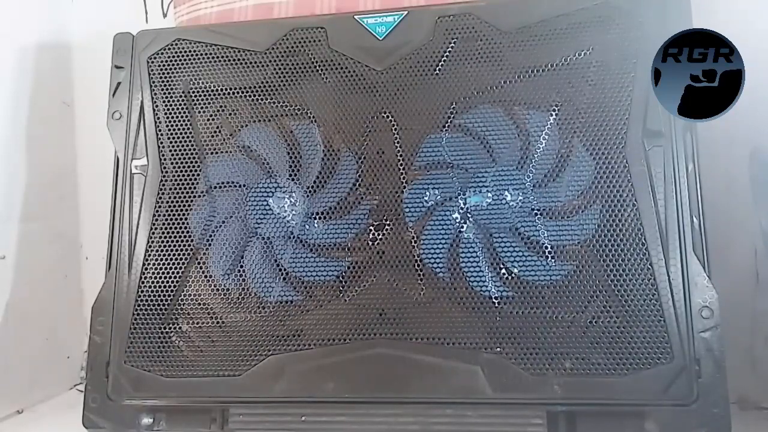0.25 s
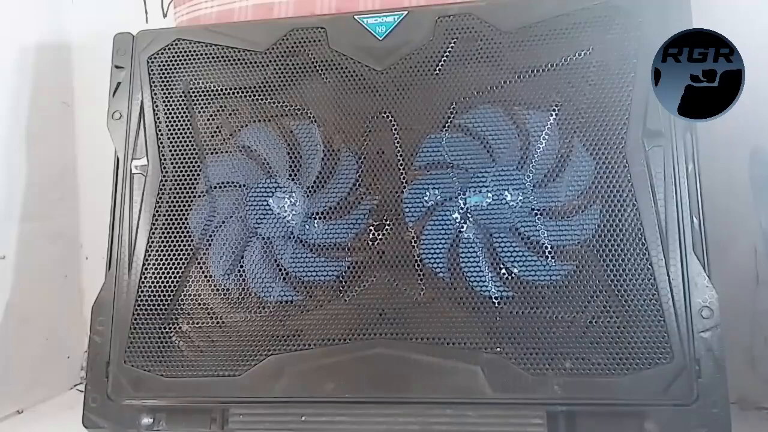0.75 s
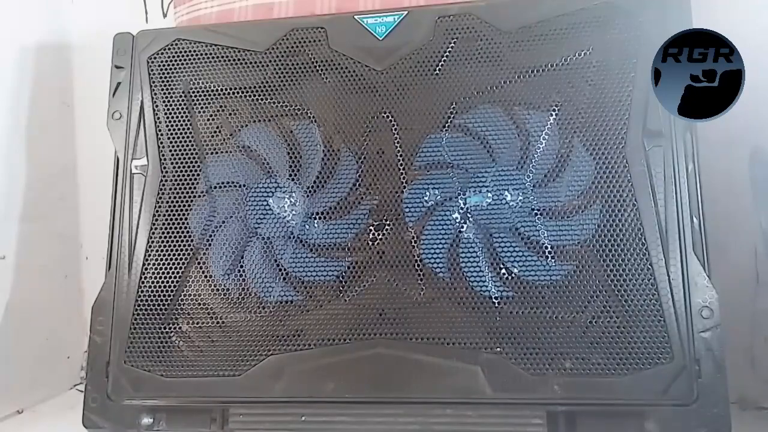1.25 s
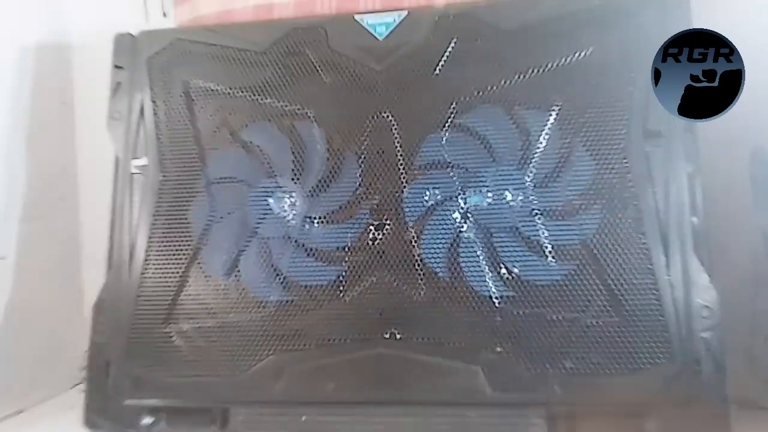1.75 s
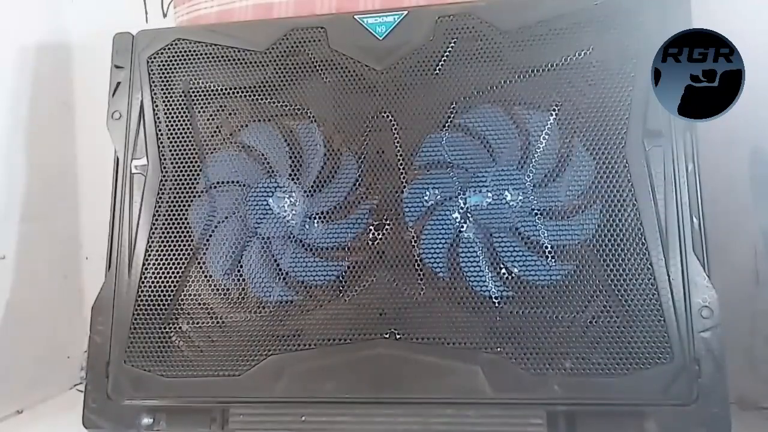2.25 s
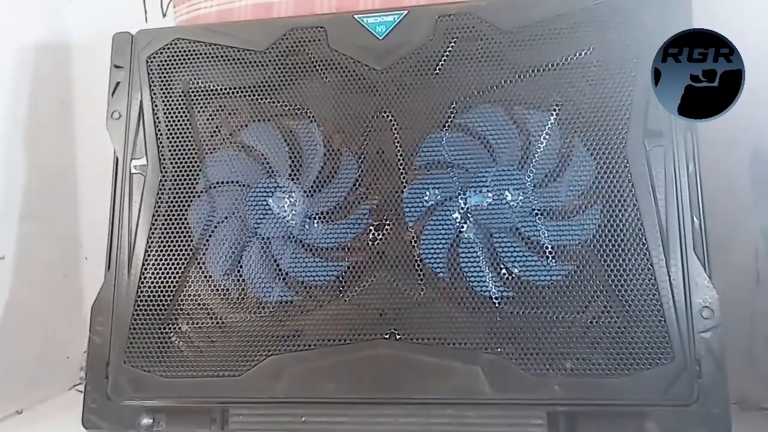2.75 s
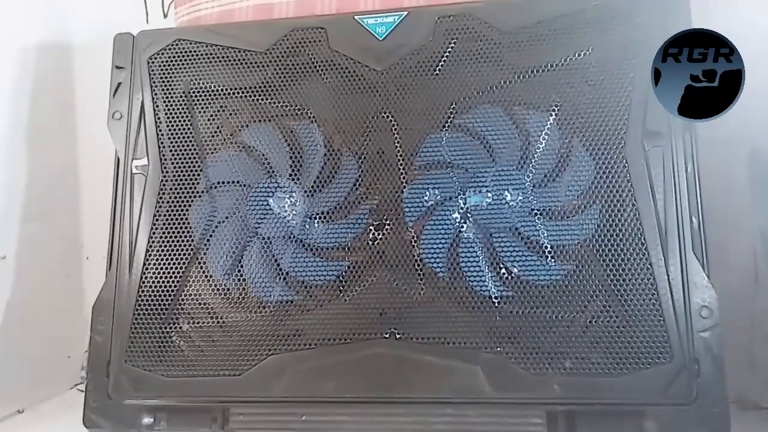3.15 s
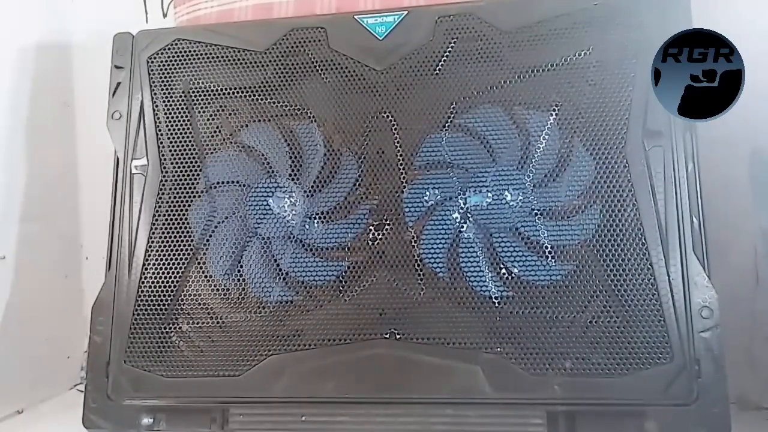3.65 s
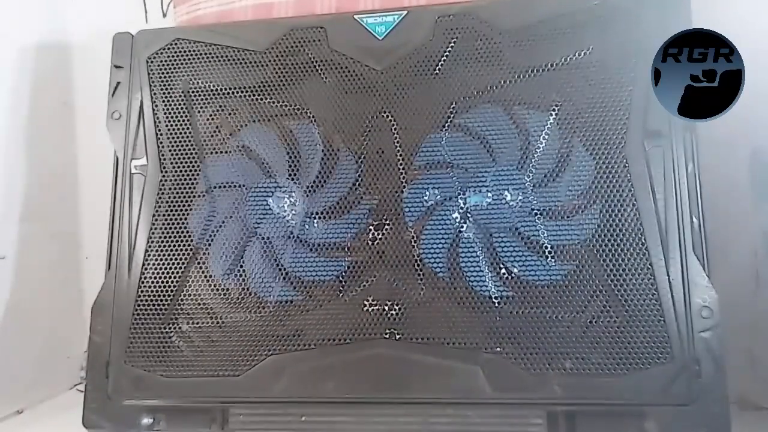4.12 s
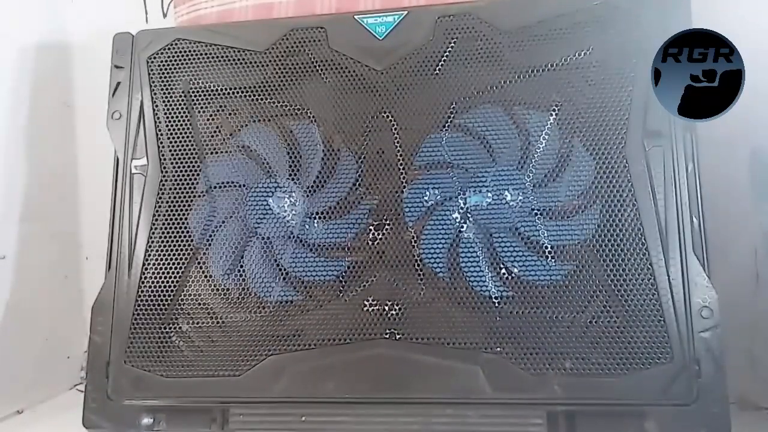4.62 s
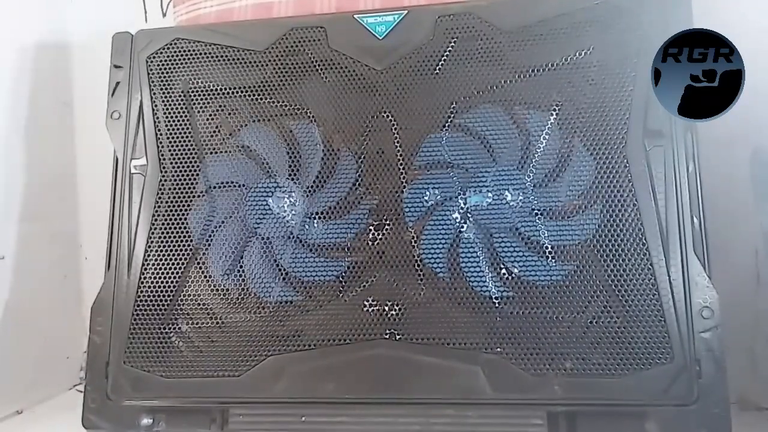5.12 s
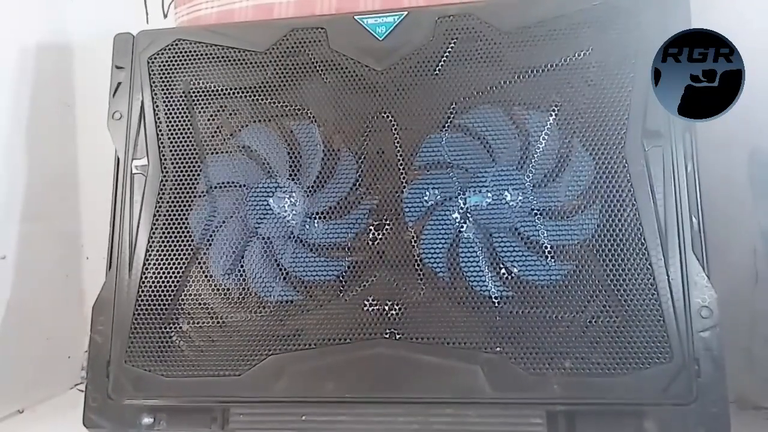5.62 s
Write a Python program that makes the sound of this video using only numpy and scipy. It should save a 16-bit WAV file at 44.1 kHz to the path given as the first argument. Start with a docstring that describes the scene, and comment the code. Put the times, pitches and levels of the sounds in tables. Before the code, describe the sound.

A gas-powered rifle fires two bursts of two shots each, about two seconds apart, at a mesh-topped plastic stand indoors. The cracks are loud and slightly distorted, with a short echo and a metallic ring. After the first burst, steel pellets ricochet, knock hollowly and roll to rest inside a box. After the second, they knock again and skip across a hard floor in bright, weakening ticks over a faint hiss.

```python
"""BB rifle in a hard-walled room

A CO2 rifle fires two full-auto bursts, two shots each, at a mesh-topped plastic stand. The gas blasts
overload the microphone and the mesh rings. Steel BBs ricochet, knock and roll about the target box,
then bounce on the hard floor. Under it all lie soft rustles, room noise and an electronic whine."""
import sys
import numpy as np
from scipy import signal
from scipy.fft import rfft, irfft, next_fast_len
from scipy.io import wavfile

SR = 44100
rng = np.random.default_rng(int(sys.argv[2]) if len(sys.argv) > 2 else 0)


def dump(signal):
    """Clip the signal to [-1, 1] and save it as 16-bit WAV at the path in sys.argv[1]."""
    limited = np.clip(np.atleast_2d(signal).T, -1, 1)
    pcm = np.round(limited * 32767).astype(np.int16)
    wavfile.write(sys.argv[1], SR, pcm)


N = 259263

# tone colour of a steel BB's hard tick: f/Hz, level/dB
TICK_SPECTRUM = [(200, -29), (1500, -30), (3300, -3.5), (4600, -1.5), (5900, 0.5), (7000, -3.5),
                 (8800, -15.5), (15000, -29)]
# tone colour of rolling and rustling: f/Hz, level/dB
RUMBLE_SPECTRUM = [(50, -42), (100, -24), (160, 2), (270, -4.5), (400, 4), (820, 6), (1600, -3.5),
                   (3200, -8), (6200, -7.5), (9000, -22), (15000, -30)]


def amp(db):
    """Turn decibels into a gain."""
    return 10 ** (np.asarray(db) / 20)


def unit(x):
    """Scale x to an average power of 1."""
    return x / np.sqrt(np.mean(x ** 2) + 1e-20)


def blow(x):
    """Scale x to the energy of 10 ms at 0 dB."""
    return x / np.linalg.norm(x) * np.sqrt(SR / 100)


def along(points, hz):
    """Read a curve of (f/Hz, value) points at hz, on a log frequency axis."""
    freqs, values = np.transpose(points)
    return np.interp(np.log(hz + 1), np.log(freqs + 1), values)


def filtered(x, response):
    """Scale each frequency in x by response(hz)."""
    size = next_fast_len(len(x) + 8192)
    return irfft(rfft(x, size) * response(np.fft.rfftfreq(size, 1 / SR)), size)[:len(x)]


def coloured(x, spectrum, size=4096):
    """Give x a tone colour without smearing sound ahead of a hit."""
    cepstrum = irfft(np.log(amp(along(spectrum, np.fft.rfftfreq(size, 1 / SR)))))
    # fold the filter's early half onto its late half
    cepstrum[1:size // 2] *= 2
    cepstrum[size // 2 + 1:] = 0
    return signal.fftconvolve(x, irfft(np.exp(rfft(cepstrum))))[:len(x)]


def add(track, s, x):
    """Mix x into the track, starting at s seconds."""
    part = track[round(s * SR):][:len(x)]
    part += x[:len(part)]


def swells(rows):
    """A gain over time that rises and falls like a hill for each row."""
    t = np.arange(N) / SR
    return np.max([amp(db) * np.exp(-((t - s) / half) ** 2) for s, half, db in rows], axis=0)


def burst(spectrum, t60, snap=0, size=8192):
    """Noise that fades by 60 dB in t60 seconds; snap adds a sharp first pulse."""
    t = np.arange(size) / SR
    noise = rng.standard_normal(size) * amp(-60 * t / t60)
    noise[0] += snap * np.linalg.norm(noise)
    return blow(coloured(noise, spectrum))


def ring(modes, spread, count=4):
    """A struck object rings: each note is a cluster of close tones, at a new strength every hit."""
    t = np.arange(SR * 3 // 4) / SR
    out = np.zeros(len(t))
    for hz, db, t60 in modes:
        detune, phase = rng.uniform(-1, 1, (2, count, 1))
        cluster = np.sin(2 * np.pi * hz * (1 + spread * detune) * t + np.pi * phase).sum(0)
        out += unit(cluster) * amp(db + rng.normal(0, 2.2) - 60 * t / t60)
    return blow(out)


def ping(t60, low_hz, high_hz, count=3, size=4096):
    """A few brief tones whose pitch depends on the spot that is struck."""
    t = np.arange(size) / SR
    hz = low_hz * (high_hz / low_hz) ** rng.random((count, 1))
    return blow(np.sin(2 * np.pi * hz * t).sum(0) * amp(-60 * t / t60))


def echo(spectrum, build_s, size=30720):
    """The walls answer a hit with a wash of sound that builds up; its middle pitches last longest."""
    # how long the room rings: f/Hz, t60/s
    room_decay = [(60, 0.12), (200, 0.48), (1000, 0.57), (3000, 0.55), (6000, 0.47), (9000, 0.35),
                  (15000, 0.31)]
    hz, t, noise = signal.stft(rng.standard_normal(size), SR, nperseg=1024)
    gain = amp(along(spectrum, hz)[:, None] - 60 * t / along(room_decay, hz)[:, None])
    tail = signal.istft(noise * gain, SR, nperseg=1024)[1][:size]
    return blow(tail * (1 - np.exp(-np.arange(size) / SR / build_s)))


def patter(spectrum, per_s, scatter_db, room_db):
    """Many tiny touches at random times, each a short scrape, with their echo."""
    taps = (rng.random(N) < per_s / SR) * amp(scatter_db * rng.uniform(-1, 1, N))
    fade = amp(-60 * np.arange(SR // 20) / SR / 0.012)
    scrapes = signal.fftconvolve(taps, fade)[:N] * rng.standard_normal(N)
    room = signal.fftconvolve(scrapes, echo(spectrum, build_s=.005))[:N]
    return unit(unit(coloured(scrapes, spectrum)) + amp(room_db) * unit(room))


def background(air_db=-61.6, whine_db=-73, whine_hz=7880, width_hz=55):
    """Quiet room noise and a thin, fuzzy electronic whine."""
    # tone colour of the room noise: f/Hz, level/dB
    air_spectrum = [(15, -50), (25, -21), (65, -8.5), (123, -3), (166, -4.5), (270, 0.5), (476, -4.5),
                    (545, -4.5), (887, -11), (988, -11.5), (3080, -15.5), (7310, -17), (7920, -13),
                    (9070, -27.5), (13200, -18), (16000, -27.5)]
    air = coloured(rng.standard_normal(N), air_spectrum)
    whine = filtered(rng.standard_normal(N), lambda hz: 1 / (1 + ((hz - whine_hz) / width_hz) ** 2))
    return amp(air_db) * unit(air) + amp(whine_db) * unit(whine)


def rustling():
    """Handling makes soft swells of tiny scrapes."""
    # rustles: peak t/s, half length/s, level/dB
    rustles = [(.2, .3, -68.5), (.58, 0.077, -64), (.89, .11, -61), (1.32, 0.16, -65), (1.65, .08, -65)]
    return swells(rustles) * patter(RUMBLE_SPECTRUM, per_s=430, scatter_db=6, room_db=0)


def rifle(room_db=2):
    """Trigger and bolt click, gas blasts out, and the BB strikes the mesh a moment later."""
    # trigger and bolt clicks: t/s, level/dB
    clicks = [(1.342, -55.5), (1.6402, -30.5), (3.782, -43.5), (3.9322, -30)]
    # shots: t/s, blast/dB, BB impact/dB, flight time/s, air push/dB, mesh ring/dB
    shots = [(1.6528, 3.5, 11.5, .017, -13.5, 1), (1.7236, 7, 8.5, .017, 0.5, 1),
             (3.9456, 4, 7.5, .019, -6, -12.5), (4.0150, 4.5, 6.5, .019, -7, -14)]
    # tone colour of blasts, impacts and clicks: f/Hz, level/dB
    blast_spectrum = [(40, -27), (100, -23), (170, -10.5), (450, -8.5), (700, -3.5), (1500, -0.5),
                      (2400, -1), (4500, 0.5), (6200, 3.5), (7200, -1.5), (8800, -11.5), (15000, -25.5)]
    # tone colour of the air pushed by an impact: f/Hz, level/dB
    push_spectrum = [(10, -2), (30, -2), (70, -9.5), (130, -9.5), (250, -11), (500, -23), (2000, -57)]
    # notes of the mesh panel: f/Hz, level/dB, t60/s
    mesh_modes = [(1416, 2, .6), (1455, 2, .62), (1531, 1.5, .65), (1570, 2.5, .55), (1760, -5, .56),
                  (2280, -11, .5), (2500, -9.5, .5), (3420, -11, .5), (6019, -7, .5), (7400, -13.5, .36)]
    out = np.zeros(N)
    for s, db in clicks:
        add(out, s, amp(db) * burst(blast_spectrum, t60=.06))
        add(out, s, amp(db + room_db) * echo(blast_spectrum, build_s=.0063))
    for s, blast_db, impact_db, flight_s, push_db, ring_db in shots:
        add(out, s, amp(blast_db) * burst(blast_spectrum, t60=.33))
        add(out, s, amp(blast_db + room_db) * echo(blast_spectrum, build_s=.0058))
        hit_s = s + flight_s
        add(out, hit_s, amp(impact_db + 5.5) * burst(blast_spectrum, t60=.091))
        add(out, hit_s, amp(impact_db + room_db) * echo(blast_spectrum, build_s=.0066))
        add(out, hit_s, amp(ring_db) * ring(mesh_modes, spread=.01))
        add(out, hit_s, amp(push_db) * burst(push_spectrum, t60=.08))
    return out


def boom(room_db=-4):
    """The hollow low note of the box and stand, with its echo."""
    # tone colour of the boom: f/Hz, level/dB
    boom_spectrum = [(40, -48), (105, -34), (150, 3), (210, -2), (330, -0.5), (500, -18), (1200, -39.5),
                     (4000, -66)]
    out = amp(room_db) * echo(boom_spectrum, build_s=.01)
    add(out, 0, burst(boom_spectrum, t60=.04, snap=.82))
    return out


def rocking_stand(push_s=.0014):
    """The stand thumps back on its feet, pushing the air and booming."""
    # jolts: t/s, air push/dB, boom/dB
    jolts = [(1.876, -16.5, -21), (2.016, -46, -25), (2.2235, -65, -44.5), (2.358, -41, -51)]
    age = np.arange(4096) / SR / push_s
    push = blow(age * (1 - age / 2) * np.exp(-age))  # one swing of pressure and its weaker return
    out = np.zeros(N)
    for s, push_db, boom_db in jolts:
        add(out, s, amp(push_db) * push)
        add(out, s, amp(boom_db) * boom())
    return out


def contact(knock_db, clack_db, tick_db, t60, room_db):
    """One BB hit: a hollow knock, a plastic clack and a hard, ringing tick, each with its echo."""
    # tone colour of the knock: f/Hz, level/dB
    knock_spectrum = [(50, -46), (90, -33), (140, -7.5), (280, -5.5), (450, -2), (750, 1.5), (1100, 2),
                      (1800, -7.5), (5000, -49)]
    # tone colour of the clack: f/Hz, level/dB
    clack_spectrum = [(300, -35), (900, -6.5), (1500, 3.5), (2500, 4.5), (3500, -6), (6000, -24.5),
                      (15000, -38)]
    # notes of the hard floor under a BB: f/Hz, level/dB, t60/s
    floor_modes = [(3550, -4.5, 0.19), (4600, 1, 0.23), (5480, 1.5, 0.3), (5970, 5.5, 0.2)]
    # a BB is too small to give off deep bass: f/Hz, level/dB
    bass_cut = [(40, -17), (130, 0)]
    out = np.zeros(SR)
    snap = .034 / max(t60, .015)  # a brief hit is nearly one clean pulse, a long one chatters
    add(out, 0, amp(knock_db - .5) * burst(knock_spectrum, t60=.05, snap=1.05))
    add(out, 0, amp(clack_db) * burst(clack_spectrum, t60, snap * .69))
    add(out, 0, amp(tick_db - 1) * burst(TICK_SPECTRUM, t60, snap))
    add(out, 0, amp(tick_db - 3) * ping(t60, low_hz=2784, high_hz=7490))
    add(out, 0, amp(tick_db + room_db - 3) * ring(floor_modes, spread=.011))
    add(out, 0, amp(knock_db + room_db + 2.5) * echo(knock_spectrum, build_s=.0021))
    add(out, 0, amp(clack_db + room_db + .3) * echo(clack_spectrum, build_s=.0021))
    add(out, 0, amp(tick_db + room_db - .3) * echo(TICK_SPECTRUM, build_s=.0021))
    return coloured(out, bass_cut)


def sharp_ticks(knock_under_clack_db=11, room_db=-11, room_db_per_s=33):
    """Hard glancing hits on the stand and mesh, plus three faint ticks near 3 s as loose BBs settle."""
    # BB ticks: t/s, tick/dB, clack above tick/dB, chatter t60/s
    ticks = [(1.8783, -5, -20, .03), (1.9078, -10.5, -3.5, .045), (2.2235, -37.5, 8, 0.044),
             (2.245, -37, 6, .048), (2.2603, -33.5, 2, 0.06), (2.3038, -40.5, 16, .03),
             (2.3085, -31, 10.5, 0.026), (2.3244, -22.5, 1, 0.056), (2.3277, -21.5, -10, .018),
             (2.3574, -13.5, -.5, 0.17), (2.3663, -17, -2, 0.06), (2.4477, -30.5, 3, 0.061),
             (2.4763, -34.5, 3.5, 0.03), (3.022, -50, 0, 0.041), (3.038, -50, -7, .03),
             (3.107, -49, -14, 0.022), (4.18, -13, -4.5, 0.12)]
    out = np.zeros(N)
    for s, tick_db, plastic_db, t60 in ticks:
        clack_db = tick_db + plastic_db
        knock_db = clack_db - knock_under_clack_db
        echo_db = room_db + room_db_per_s * t60  # a long chatter fills the room more
        add(out, s, contact(knock_db, clack_db, tick_db, t60, echo_db))
    return out


def rolling():
    """BBs rumble as they roll in the box, loudest when fastest."""
    # rolls: peak t/s, half length/s, level/dB
    rolls = [(2.15, 0.22, -42), (2.44, .08, -43), (2.66, .19, -38), (3, .12, -54.5), (3.32, 0.098, -53)]
    return swells(rolls) * patter(RUMBLE_SPECTRUM, per_s=600, scatter_db=5.5, room_db=-4)


def box_knocks(tick_under_clack_db=8, wall_ring_db=-13):
    """BBs drop on the box walls, which ring and boom; a harder spot gives more clack and tick."""
    # drops: t/s, knock/dB, clack above knock/dB, boom/dB
    drops = [(2.0013, -15.5, -2, -26.5), (2.086, -34.5, 5.5, -55), (2.1028, -21.5, -1.5, -40),
             (2.173, -24, -2.5, -45), (2.5319, -26.5, 2, -57), (2.5824, -38, 5, -62), (2.613, -45, 10, -60),
             (2.6333, -29, 4, -41), (2.6744, -32.5, 5, -41), (2.7196, -30, 0, -38), (2.7471, -36, -1, -37),
             (2.775, -37, -4, -48), (2.8178, -27.5, -15, -39), (2.8631, -36, 3, -47),
             (2.9074, -26, -15.5, -43), (2.9703, -37.5, -2, -52), (3.1653, -38, -19, -55),
             (3.2205, -46.5, -8, -65), (4.3461, -17.5, -5.5, -33), (4.4698, -25, -1.5, -41),
             (5.1472, -40, -0.5, -62)]
    # the soft wall dulls the treble: f/Hz, level/dB
    soft_wall = [(1700, .5), (3000, -3.5), (6000, .5), (10000, -3)]
    # notes of the wall: f/Hz, level/dB, t60/s
    wall_modes = [(738, -1, 0.1), (980, 0, .08), (1297, -4, .07)]
    out = np.zeros(N)
    for s, knock_db, hard_db, boom_db in drops:
        clack_db = knock_db + hard_db
        hit = contact(knock_db, clack_db, clack_db - tick_under_clack_db, t60=.042, room_db=-9)
        add(out, s, coloured(hit, soft_wall))
        add(out, s, amp(knock_db + wall_ring_db) * ring(wall_modes, spread=.05, count=2))
        add(out, s, amp(boom_db) * boom())
    return out


def settling(start_s=2.4, end_s=3.25, first_db=-42, last_db=-55, room_db=-8, count=34):
    """Loose BBs touch each other with tiny pings, fainter as they come to rest."""
    out = np.zeros(N)
    for k, (delay, softness) in enumerate(rng.random((count, 2))):
        progress = (k + delay) / count
        s = start_s + (end_s - start_s) * progress
        db = first_db + (last_db - first_db) * progress - 9 * softness
        add(out, s, amp(db - 1) * ping(t60=.025, low_hz=2780, high_hz=7400))
        add(out, s, amp(db - .5) * burst(TICK_SPECTRUM, t60=.02, snap=.86))
    room = signal.fftconvolve(out, echo(TICK_SPECTRUM, build_s=.003))[:N]
    return out + amp(room_db) * np.std(out) * unit(room)


def floor_bounces(near_db=-20):
    """BBs bounce away over the hard floor; weaker bounces are duller, longer and carry more echo."""
    # bounces: t/s, tick/dB
    bounces = [(4.3718, -17), (4.7564, -28), (4.7864, -18.5), (4.9733, -34), (4.9879, -36.5), (5.0799, -22),
               (5.1579, -33), (5.2799, -30), (5.3857, -46.5), (5.4186, -43.5), (5.4503, -33), (5.553, -41),
               (5.5897, -38), (5.6847, -35.5), (5.7547, -43.5), (5.7733, -40), (5.834, -40)]
    out = np.zeros(N)
    for s, tick_db in bounces:
        loss_db = max(near_db - tick_db, 0)  # how much weaker than a bounce close by
        hit = contact(knock_db=-45 - .38 * loss_db, clack_db=-32 - .66 * loss_db, tick_db=tick_db,
                      t60=.022 + .0011 * loss_db, room_db=-4.5 + .31 * loss_db)
        treble_cut = [(6500, 0), (10000, -.18 * loss_db)]
        add(out, s, coloured(hit, treble_cut))
    return out


def skittering():
    """BBs skip over the floor in a scatter of faint ticks."""
    # skitter: peak t/s, half length/s, level/dB
    skitter = [(5.7, 0.35, -49.5)]
    return swells(skitter) * patter(TICK_SPECTRUM, per_s=50, scatter_db=7, room_db=3)


def scene():
    """Mix all the sounds into one channel."""
    mix = background() + rustling() + rifle() + rocking_stand()
    mix += sharp_ticks() + rolling() + box_knocks() + settling() + floor_bounces() + skittering()
    return mix[None]


def record(dry, knee_db=-9, squeeze=.43, lag_s=.025, ceiling_db=-1.1, hardness=4, top_hz=16000):
    """A slow gain control turns the roar down but lets blasts overload; the highest treble is cut."""
    x = dry[0]
    memory = np.exp(-1 / (lag_s * SR))
    power = signal.lfilter([1 - memory], [1, -memory], x ** 2)
    ducked = x * (1 + power / amp(knee_db) ** 2) ** (-squeeze / 2)
    clipped = ducked / (1 + np.abs(ducked / amp(ceiling_db)) ** hardness) ** (1 / hardness)
    return filtered(clipped, lambda hz: 1 / (1 + (hz / top_hz) ** 300))[None]


dry = scene()
out = record(dry)
dump(out)
```